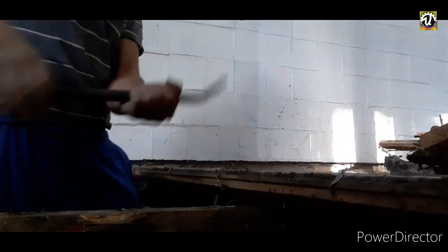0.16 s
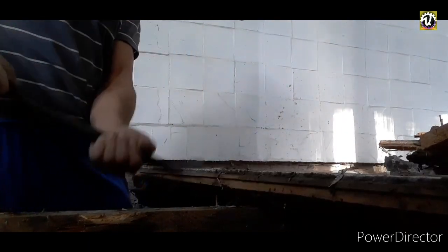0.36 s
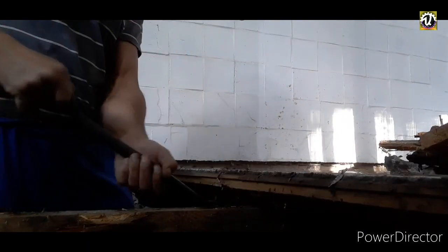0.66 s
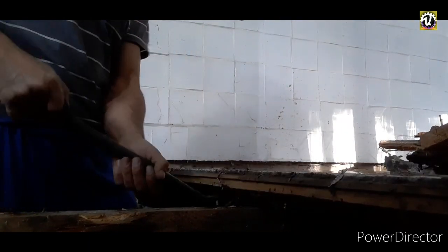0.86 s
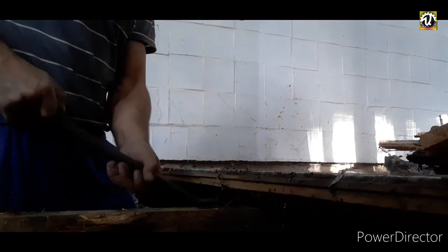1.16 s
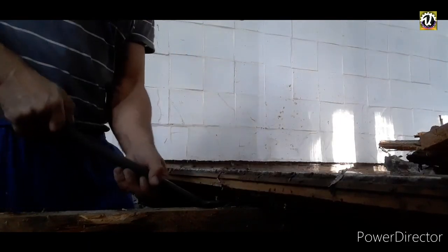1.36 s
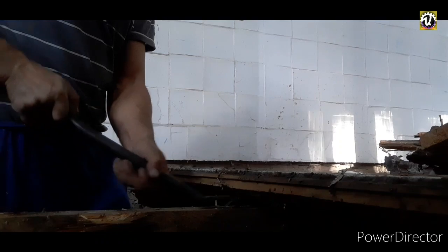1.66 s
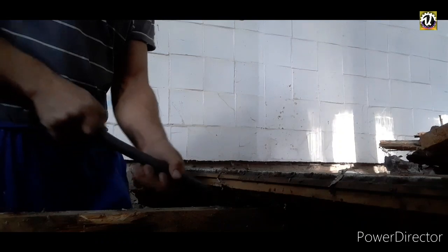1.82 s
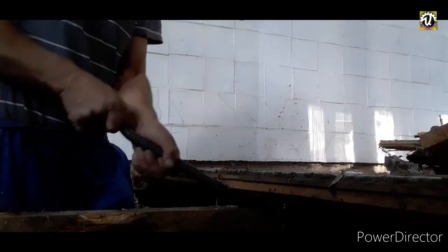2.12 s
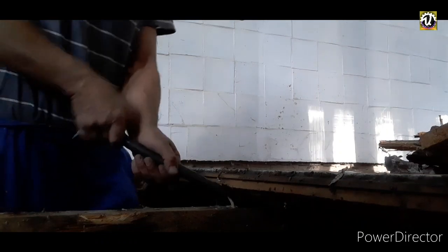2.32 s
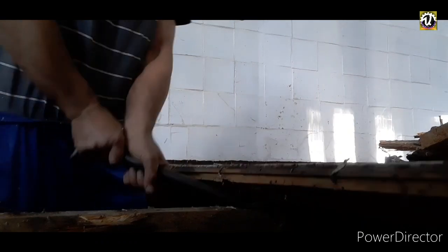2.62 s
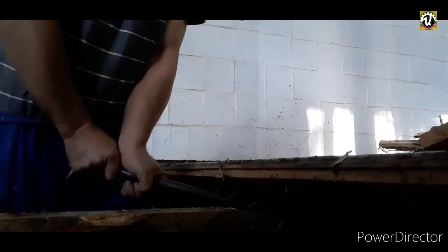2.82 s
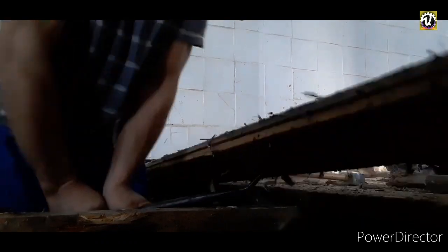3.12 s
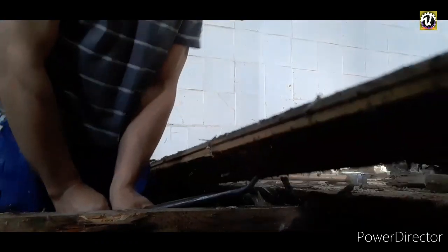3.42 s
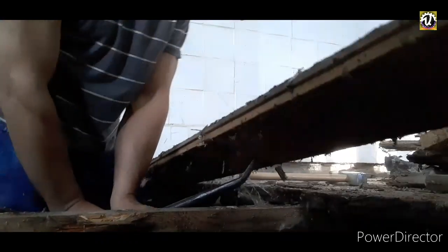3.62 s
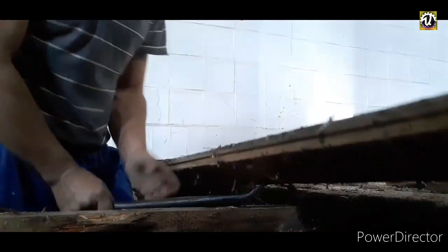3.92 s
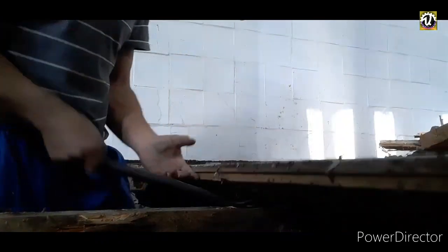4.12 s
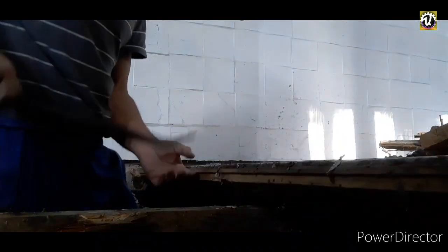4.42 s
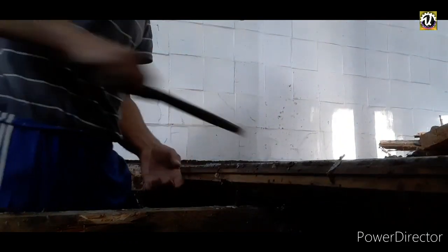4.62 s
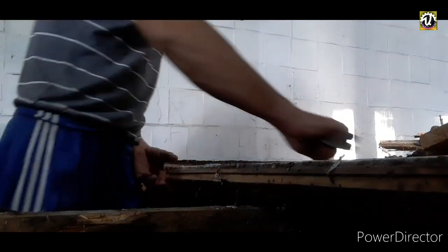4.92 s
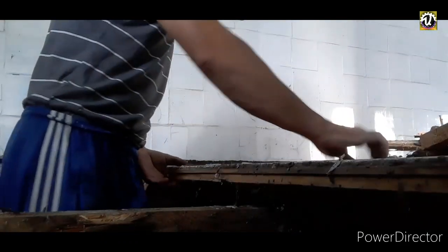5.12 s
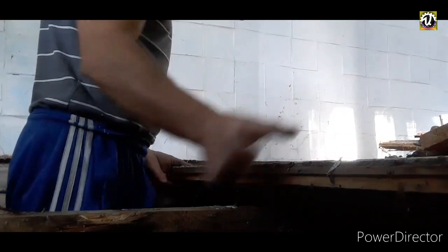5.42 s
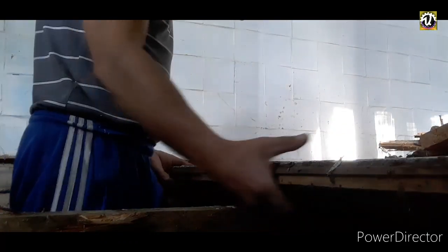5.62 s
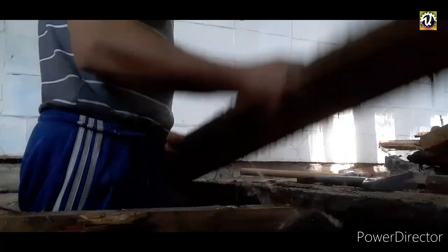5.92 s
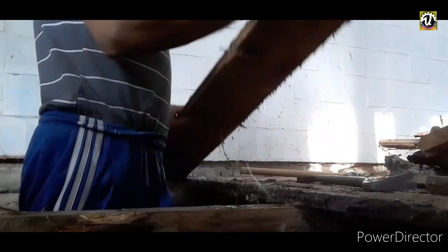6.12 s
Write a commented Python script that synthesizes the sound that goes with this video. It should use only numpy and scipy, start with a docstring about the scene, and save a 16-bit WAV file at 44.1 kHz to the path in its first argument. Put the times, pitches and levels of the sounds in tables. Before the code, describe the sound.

Faint wooden bumps open over a quiet hush, close to the microphone in a bare room that rings briefly after each sound. At about 0.8 seconds a steel crowbar clicks against an old floorboard. Hollow wooden knocks follow at 1.2 and 1.4 seconds, with small metal clinks and a very short nail squeak at 1.5. Softer knocks and grinding come around 2 seconds. From 2.7 seconds wood fibres crackle, building to a loud splintering crack at about 3.15 as the board tears free. Grit trickles down amid light knocks and snaps until 4.5. Around 5 seconds comes a clatter of wooden knocks, then a loud clank and scrape at 5.2, the steel ringing briefly. After a short lull, a thin, high nail squeak at 5.9 leads into a sharp crack at 6, with smaller snaps, knocks and falling grit to the end.

```python
"""Prying up an old floorboard

A bare room, with a phone's two microphone ports close to where a steel bar levers up a board.
Each knock leaves floor and room ringing low; slipping wood grinds, fibres snap, the board tears free.
Taps ring the steel, nails squeak by stick-slip in their holes, and grit trickles down.
The room rings on briefly after each sound, over a faint steady hush."""
import sys
import numpy as np
from scipy import signal
from scipy.fft import rfft, irfft
from scipy.io import wavfile
from scipy.ndimage import uniform_filter1d

SR = 44100
rng = np.random.default_rng(int(sys.argv[2]) if len(sys.argv) > 2 else 0)


def transcribe(u):
    """Save the signal u as a 16-bit wav file named by the first command-line argument.

    u: samples, shape (n,) or (channels, n), limited to [-1, 1]; the rate is SR.
    q: integer samples, one column per channel.
    """
    v = np.clip(np.atleast_2d(u).T, -1, 1)
    q = np.round(v * 32767).astype(np.int16)
    wavfile.write(sys.argv[1], SR, q)


N = 276066

# Blows on the floor; weight thumps, hardness clacks, and the struck spot favours one pitch:
# start_s, level_db, weight_db, hardness_db, spot_hz, spot_db
FLOOR_KNOCKS = [(.009, -54, 6.5, -1, 310, 2.5), (0.132, -59, -7, -3.5, 307, -5),
                (.409, -59, -4.5, -11, 310, 4.5), (.755, -45.5, 11.5, 3.5, 700, -6),
                (0.798, -38, 11, -4.5, 240, 6.5), (.911, -63, 2, -3, 900, 0),
                (.986, -58.5, 9, 9.5, 870, 16), (1.005, -52, 6, 6.5, 900, 6),
                (1.17, -28, 0.5, -3.5, 248, 10), (1.203, -20, -6, -18, 260, 4),
                (1.354, -37.5, -17, 2, 650, -4), (1.406, -21.5, 0.5, -6.5, 246, 7.5),
                (1.437, -18, -13.5, -17.5, 256, 4.5), (1.597, -64.5, -9, 10, 920, 13.5),
                (1.887, -32.5, -3.5, -9, 341, 0), (1.925, -35, 8.5, -5, 280, -1),
                (1.956, -35.5, 9.5, -2, 362, -6), (1.984, -36, 2, -19, 200, 3),
                (2.006, -43, -5, -15, 280, 12), (2.183, -39.5, 7, -3.5, 240, 7),
                (2.228, -41, 10.5, -0.5, 310, -1), (2.287, -35.5, -7.5, -13, 310, -12),
                (2.695, -47.5, 0, 4.5, 520, 4), (2.744, -45.5, 0, 4.5, 600, 1.5),
                (2.929, -41, -22, 5.5, 520, 0), (2.999, -44, -14.5, 7, 523, -3),
                (3.045, -44.5, -12, 9.5, 526, 1), (3.126, -25.5, -1.5, 8.5, 735, -1),
                (3.153, -14.5, -0.5, 1.5, 550, 14.5), (3.186, -16, -11, -6.5, 550, 13),
                (3.215, -25.5, -38, -13, 380, 12), (3.248, -26.5, -21.5, -13, 305, 12.5),
                (3.515, -38.5, 4, -8.5, 252, 0.5), (3.585, -45, -0.5, 1.5, 398, 5.5),
                (3.668, -51, 12, 2.5, 310, 0.5), (4.004, -56.5, 13, -5.5, 116.2, 4.5),
                (4.171, -42.5, 0.5, 9, 643, -4), (4.228, -40, 6, 1, 248.3, -0.5),
                (4.299, -45.5, 6, -3.5, 313, -3), (4.498, -59, -5.5, 2.5, 301.6, 0.5),
                (4.607, -57.5, -11, -0.5, 314, 4), (4.931, -22.5, -14, -5, 353, 3),
                (4.954, -23.5, -0.5, -1.5, 350, 9), (5.001, -23, -11, -0.5, 358, 6.5),
                (5.035, -32, -18, -15, 353, 11), (5.076, -24, -17, -8, 726, 2),
                (5.215, -12.5, -15, 0.5, 800, 8), (5.229, -25.5, -4, 1.5, 920, -7),
                (5.258, -13.5, -21, -22, 250, 11), (5.671, -55, -9, -4, 412, 10),
                (5.94, -40.5, -12, 2.5, 510, 0.5), (5.989, -33.5, -6, 9.5, 530, 3.5),
                (6.018, -33, -10, -5.5, 404, 3), (6.099, -40, -18, 4.5, 497, -1),
                (6.153, -35, 2.5, -4.5, 280, 3), (6.198, -39.5, 7, 2.5, 277, 1)]
# Wood fibres snapping: start_s, level_db, treble_boost_db
FIBRE_CRACKS = [(.755, -28.5, 3), (1.354, -35.5, 5), (1.39, -26.5, -9), (1.884, -44, 7), (1.92, -39, 13.5),
                (1.962, -43, -6), (2.181, -42.5, -13), (2.287, -41, 11.5), (2.695, -29.5, 15.5),
                (2.741, -41, 26.5), (2.808, -43, 12), (2.848, -37.5, 17.5), (2.864, -51, 19),
                (2.9, -50.5, 20), (2.912, -56, 9), (2.922, -37, 15), (2.926, -32, 27), (2.935, -25, 15),
                (2.994, -30, 20.5), (3.003, -29.5, 20), (3.043, -24.5, 17), (3.119, -21, 0),
                (3.127, -13.5, -2), (3.146, -24, 15.5), (3.154, -8, 3.5), (3.158, -14, 5.5),
                (3.166, -35, -1), (3.187, -31, -3), (3.354, -45.5, 15), (3.56, -54.5, 17.5),
                (3.583, -38.5, 16), (3.602, -38.5, -10), (3.703, -44, 18), (3.762, -48.5, 17),
                (3.834, -49, 3.5), (3.978, -43, 8.5), (4.175, -32.5, -6), (4.252, -41, 5),
                (4.338, -49, 7.5), (4.927, -35.5, 3), (4.945, -26.5, -10.5), (4.992, -25.5, -12),
                (5.062, -25.5, 0), (5.073, -23.5, 2), (5.097, -25, -15), (5.189, -29, -12),
                (5.215, -18, -8), (5.989, -10.5, -7), (5.998, -30, 19.5), (6.027, -36, -10),
                (6.122, -27, 5), (6.149, -34.5, 9), (6.218, -36, 9), (6.248, -30, 8.5)]
# Taps on the steel: start_s, level_db, favoured_hz, spread_octaves, ring_share (0-1, 1 rings freely)
BAR_TAPS = [(0.756, -38, 3950, 0.044, 0.2), (0.757, -36.5, 2350, 0.21, 0.28),
            (.757, -36, 12800, 0.21, 0.07), (.91, -42, 2020, 0.11, 0.2), (.94, -51, 2100, 0.27, .4),
            (.974, -54.5, 4220, 0.044, 0.22), (0.984, -44, 7730, 0.079, 0.06),
            (1.352, -30.5, 3950, 0.037, 0.3), (1.376, -39, 2540, .1, 0.44), (1.392, -33, 5700, 0.054, 0.23),
            (1.398, -42, 11600, 0.47, 0.1), (1.594, -42, 11300, .05, 0.36),
            (2.185, -57.5, 8100, 0.13, 0.57), (2.288, -41, 7900, 0.081, 0.1),
            (4.339, -62.5, 3910, 0.052, .6), (4.93, -43, 10300, 0.47, 0.37),
            (4.946, -45.5, 6600, 0.13, 0.17), (5.095, -36.5, 3660, 0.028, 1),
            (5.215, -24.5, 2070, 0.26, 0.51), (5.223, -33, 4200, .03, 0.98), (5.229, -40.5, 7630, 0.032, 1),
            (5.24, -44.5, 5300, 0.19, 0.7), (5.235, -39.5, 3470, 0.18, 0.73),
            (5.295, -36, 3600, 0.54, 0.22), (5.335, -37.5, 3560, 0.063, 0.4),
            (5.401, -52.5, 3510, 0.022, 0.4), (5.461, -57, 4160, 0.018, 1)]
# Nails slipping: start_s, length_s, level_db, start_hz, end_hz, unsteadiness (share of the pitch)
NAIL_SLIPS = [(1.478, .02, -21, 2555, 2550, .014), (5.897, .085, -33, 5870, 6350, .016)]
# Harmonics of a squeak: multiple, level_db
SQUEAK_HARMONICS = [(1, -12), (2, -17.5), (3, -26.5), (4, -46.5), (5, -51.5)]
# Course of the rubbing: time_s, grinding_db, grit_db
RUB_LEVELS = [(0, -68, -65), (.3, -74.5, -77), (.62, -97, -84), (.75, -90, -80), (.77, -63, -76),
              (.92, -55, -73), (1.22, -73, -75), (1.4, -55, -75), (1.64, -81, -81.5), (1.75, -110, -105),
              (1.87, -85, -76), (1.93, -38, -63), (2.09, -86, -86), (2.19, -48, -76.5), (2.3, -54, -76),
              (2.42, -67.5, -82.5), (2.68, -56, -67.5), (2.7, -57.5, -69), (2.76, -50.5, -61.5),
              (2.84, -51.5, -75), (2.91, -67, -77), (2.94, -52, -56), (2.99, -53, -69), (3.06, -44.5, -66),
              (3.15, -27, -46), (3.28, -48.5, -66.5), (3.4, -53.5, -84.5), (3.57, -59, -80.5),
              (3.6, -45, -74.5), (3.65, -52, -58), (3.705, -55, -62.5), (3.78, -60.5, -73), (4, -72, -69.5),
              (4.16, -47, -68), (4.2, -50, -66.5), (4.5, -68.5, -94), (4.92, -86.5, -105),
              (4.94, -41.5, -64), (5.04, -34, -58), (5.09, -36.5, -59), (5.2, -34, -69), (5.23, -21, -66),
              (5.33, -30, -75), (5.5, -73.5, -83.5), (5.84, -64, -100), (5.9, -48, -65.5),
              (5.98, -41.5, -57.5), (6.0, -47.5, -50), (6.1, -42, -62), (6.14, -45.5, -59),
              (6.26, -49.5, -68)]
# Low ringing of the floor and the bare room after each blow: pitch_hz, level_db, t60_s
LOW_RING_MODES = [(191, -10, 0.24), (198, -22.5, 0.05), (238.3, -5, 0.25), (277.3, -4.5, 0.14)]
LOW_MID_RING_MODES = [(312.45, -1.5, 0.22), (346.2, -3.5, 0.15), (382, 1, 0.079)]
# Modes of the joists, the edge's clack, the slap and the steel bar: pitch_hz, level_db, t60_s
JOIST_MODES = [(67, -3, .4), (83, -7.5, 0.51), (103.2, -6, 0.23), (117.95, 3.5, 0.34), (143, -2.5, 0.39)]
EDGE_MODES = [(440, -6, 0.15), (486, -6, 0.082), (544, -5.5, 0.16), (612, 5.5, 0.018), (669, -7.5, 0.045),
              (732.1, -4, 0.075)]
SLAP_MODES = [(837, 1, 0.024), (920, -5, 0.045), (1020, -13, 0.3), (1096, -20.5, 0.29), (1184, -7, 0.034),
              (1383, -4.5, 0.0094)]
BAR_MODES = [(1830, -4, .3), (1986, -2, .28), (2595, -2, .3), (3257, -8, .24), (3435, -8, 1.4),
             (3499, -6, .33), (3564, -3, .4), (3946, -3, .3), (4199, 0, .45), (5050, -4, .8),
             (5561, -2, .15), (6223, -4, .4), (6293, -8, 1.2), (7300, -8, .3), (7687, -4, .3),
             (7908, -6, .5), (8129, -4, .45), (9000, -6, .15), (10590, -2, .25), (11070, -6, .2),
             (12160, -8, .3), (13200, -8, .2), (14200, -8, .2)]
# Spectra of the snaps, the grit and the room tone: frequency_hz, gain_db
SNAP_SPECTRUM = [(760, -4), (1300, 10), (1430, -1), (1840, 6.5), (1980, 5), (5960, -4), (6480, -10.5),
                 (8430, -4.5), (10000, -21.5), (11200, -12.5), (13000, -12.5), (16000, -19.5)]
GRIT_SPECTRUM = [(760, -11), (1300, -7.5), (1520, -29), (1780, -6.5), (2370, -10.5), (3420, -5.5),
                 (6480, -1), (8300, 0), (9970, -14.5), (11200, -5), (13000, -4), (16000, -7)]
HUSH_SPECTRUM = [(24, -52), (40, -12.5), (329, 5.5), (516, 1.5), (1480, -17), (1950, -20), (4030, -17),
                 (5050, -8.5), (7360, -14), (9450, -18), (16000, -22)]
# Tail of the bare room: frequency_hz, t60_s, port_likeness (0-1), level_db
ROOM_BANDS = [(59.6, 0.49, 0.84, -9), (244, 0.44, 0.7, -5), (550, 0.36, 0.5, 3), (1000, 0.29, 0.21, 9.5),
              (3900, 0.32, 0, 10), (12000, 0.18, 0, 5.5)]
# Balance of the two ports: frequency_hz, left_minus_right_db
PORT_BALANCE = [(60, 1), (110, -0.5), (200, -2.5), (380, -3), (700, -4), (1290, -5.5), (2380, 0),
                (4400, -6.5), (8120, -4.5), (15000, 2)]

TOP_HZ = 15700  # upper limit of the phone


def knocks_and_grinding():
    """Blows ring floor and room, heavy ones thump, hard ones clack; slipping wood grinds between."""
    starts, db, weight, hardness, *spot = np.transpose(FLOOR_KNOCKS)
    times, grinding_db, _ = np.transpose(RUB_LEVELS)
    slips = grains(per_s=400, scatter_db=8.5)
    swell_s = .0034
    struck = rubbed = 0
    for modes, gain_db, heavy, hard, swell_share, rub_db in [
            (JOIST_MODES, -1.5, 1, 0, 1.2, -6),
            (LOW_RING_MODES, .1, .4, 0, .8, -2),
            (LOW_MID_RING_MODES, 4, 0, 0, .8, -1),
            (EDGE_MODES, 7, 0, 1, .4, -6),
            (SLAP_MODES, -3, 0, 1.1, .2, -10)]:
        blow_db = db + gain_db + heavy * weight + hard * hardness
        struck += knocks(modes, starts, blow_db, spot, swell_s * swell_share)
        rubbed += undb(rub_db) * unit(resonate(slips, modes))
    wood = struck + unit(rubbed) * undb(curve(times, grinding_db))
    # little treble above 1.5 kHz gets out of the knocks and grinding
    return butter(wood, 3, 1500, "low")


def knocks(modes, starts, levels_db, spot, swell_s, detune=.018, scatter_db=2.5, spot_octaves=.17):
    """Each blow rings a group of modes from its own spot, with new phases, sizes and tuning."""
    step = 8  # low modes need only an eighth of the sample rate
    out, t = np.zeros(N // step + SR), np.arange(SR // step) * step / SR
    hz, mode_db, t60 = np.transpose(modes)[:, :, None]
    swell = 1 - np.exp(-t / max(swell_s, .001))
    chance = rng.standard_normal((len(starts), 3, len(modes), 1))
    for start_s, db, spot_hz, spot_db, (off, size, phase) in zip(starts, levels_db, *spot, chance):
        favour_db = spot_db * nearness(hz, spot_hz, spot_octaves)
        decay = undb(mode_db + favour_db + scatter_db * size - 60 * t / t60)
        rings = decay * np.sin(2 * np.pi * (hz * (1 + detune * off) * t + phase))
        at = int(start_s * SR / step)
        out[at:at + len(t)] += undb(db) * swell * rings.sum(axis=0)
    return signal.resample_poly(out, step, 1)[:N] / np.sqrt(np.sum(undb(2 * mode_db)))


def fibre_cracks(snap_s=.0018, split_hz=7000):
    """Fibres snap in short bursts of noise, each with a dull and a bright half."""
    starts, db, treble_db = np.vstack([FIBRE_CRACKS, splinters()]).T
    dull = butter(bursts(starts, db, snap_s), 2, split_hz, "low")
    bright = butter(bursts(starts, db + treble_db, snap_s), 2, split_hz, "high")
    return colour(dull + bright, SNAP_SPECTRUM)


def splinters(count=9, start_s=3.05, end_s=3.15, treble_db=20):
    """The board tears free: extra crack rows, small and bright, at loosely even moments."""
    along = (np.arange(count) + rng.random(count)) / count
    db = -34.5 + 2 * rng.standard_normal(count)
    return np.transpose([start_s + along * (end_s - start_s), db, np.full(count, treble_db)])


def steel_bar(scrape_s=.0033, flutter_db=5):
    """A tap feeds the modes near its favoured pitch; a firm grip shortens and shakes the ring."""
    out, t = np.zeros(N + 2 * SR), np.arange(SR) / SR
    hz, mode_db, t60 = np.transpose(BAR_MODES)[:, :, None]
    swell = 1 - np.exp(-t / scrape_s)
    for start_s, db, favoured_hz, spread, ring_share in BAR_TAPS:
        near = nearness(hz, favoured_hz, spread)
        excited = near[:, 0] > .01
        shake = unit(uniform_filter1d(rng.standard_normal((len(hz), SR // 50)), 6))
        flutter = undb(flutter_db * (1 - ring_share) * shake).repeat(50, axis=1)
        decay = near * undb(db + mode_db - 60 * t / (ring_share * t60))
        rings = decay * np.sin(2 * np.pi * hz * t) * uniform_filter1d(flutter, 50)
        at = int(start_s * SR)
        out[at:at + SR] += swell * rings[excited].sum(axis=0)
    return out[:N]


def nail_squeaks(rise_db=12, fall_db_per_s=1300):
    """Fast stick-slip: an unsteady, gliding tone swells while the nail slips, then drops away."""
    out, t = 0, np.arange(N) / SR
    for start_s, length_s, db, start_hz, end_hz, unsteadiness in NAIL_SLIPS:
        pitch_wobble, level_wobble = unit(uniform_filter1d(rng.standard_normal((2, N)), 150))
        end_s = start_s + length_s
        slip_hz = curve([start_s, end_s], [start_hz, end_hz]) * (1 + unsteadiness * pitch_wobble)
        phase = 2 * np.pi * np.cumsum(slip_hz) / SR
        shape_db = np.minimum(rise_db * (t - end_s) / length_s, -fall_db_per_s * (t - end_s))
        tone = sum(undb(harmonic_db) * np.sin(k * phase)
                   for k, harmonic_db in SQUEAK_HARMONICS if k * end_hz < TOP_HZ)
        out += np.sqrt(2) * (t > start_s) * undb(db + shape_db + .82 * level_wobble) * tone
    return out


def falling_grit():
    """Dust and crumbs trickle down: dense tiny clicks over a soft hiss."""
    times, _, grit_db = np.transpose(RUB_LEVELS)
    trickle = unit(grains(per_s=2300, scatter_db=6)) + .75 * rng.standard_normal(N)
    return unit(colour(trickle, GRIT_SPECTRUM)) * undb(curve(times, grit_db))


def bare_room(source, wet_db, build_s=.004, right_lag_s=.00033):
    """Sound reaches the left port first; a diffuse tail builds up behind it and dies band by band."""
    t = np.arange(SR) / SR
    hz, *columns = np.transpose(ROOM_BANDS)
    response = 0
    for centre_hz in 44 * 2 ** np.arange(0, 8.6, .5):
        low_hz, high_hz = centre_hz / 2 ** .25, centre_hz * 2 ** .25
        t60, likeness, db = (np.interp(np.log(centre_hz), np.log(hz), column) for column in columns)
        mid, side = butter(rng.standard_normal((2, SR)), 2, [low_hz, high_hz], "band")
        tail = np.sqrt(1 + likeness) * mid + np.sqrt(1 - likeness) * np.array([side, -side])
        tail *= (1 - np.exp(-t / build_s)) * undb(-60 * t / t60)
        band_share = (high_hz - low_hz) / (SR / 2)
        energy = np.sum(tail ** 2, axis=1, keepdims=True)
        response += undb(db + wet_db) * tail * np.sqrt(band_share / energy)
    response[:, 0] += 1  # direct sound
    response[1] = np.roll(response[1], int(right_lag_s * SR))
    return signal.fftconvolve(response, source[None], axes=1)[:, :N]


def room_tone():
    """A faint, steady hush, separate at each port."""
    return undb(-70) * unit(colour(rng.standard_normal((2, N)), HUSH_SPECTRUM))


def resonate(drive, modes):
    """Ring decaying modes with a driving signal and add them up."""
    out = 0
    for hz, db, t60 in modes:
        radius, angle = np.exp(-np.log(1000) / (t60 * SR)), 2 * np.pi * hz / SR
        feedback = [1, -2 * radius * np.cos(angle), radius ** 2]
        out += undb(db) * signal.lfilter([0, radius * np.sin(angle)], feedback, drive)
    return out


def bursts(starts, db, decay_s, size=4096):
    """Noise bursts that swell quickly and die away."""
    out, age = np.zeros(N + size), np.arange(size) / SR / decay_s
    shape = (1 - np.exp(-age / .37)) * np.exp(-age)
    for start_s, gain in zip(starts, undb(db) * np.sqrt(decay_s * SR / 2 / size)):
        at = int(start_s * SR)
        out[at:at + size] += gain * unit(rng.standard_normal(size) * shape)
    return out[:N]


def grains(per_s, scatter_db):
    """Random clicks of widely scattered size."""
    hit = rng.random(N) < per_s / SR
    return hit * rng.choice([-1, 1], N) * undb(scatter_db * np.minimum(rng.exponential(size=N), 4))


def colour(x, spectrum):
    """Filter by (frequency_hz, gain_db) points on a log axis."""
    hz, db = np.transpose(spectrum)
    bins_hz = np.maximum(np.fft.rfftfreq(N, 1 / SR), 1)
    return irfft(rfft(x) * undb(np.interp(np.log(bins_hz), np.log(hz), db)), N)


def nearness(hz, centre_hz, octaves):
    return np.exp(-.5 * (np.log2(hz / centre_hz) / octaves) ** 2)


def butter(x, order, hz, kind):
    return signal.sosfilt(signal.butter(order, hz, kind, fs=SR, output="sos"), x)


def curve(times, values):
    return np.interp(np.arange(N) / SR, times, values)


def undb(db):
    return 10 ** (np.asarray(db, float) / 20)


def unit(x):
    return x / np.sqrt(np.mean(x ** 2))


def scene():
    """Wood, grit and steel at close range in the bare room, as they reach the two ports."""
    hush = room_tone()
    sound = bare_room(knocks_and_grinding(), wet_db=-2)
    sound += bare_room(falling_grit(), wet_db=2.5)
    sound += bare_room(fibre_cracks(), wet_db=-8)
    sound += bare_room(steel_bar() + nail_squeaks(), wet_db=-9)
    left = colour(sound[0], [(hz, db / 2) for hz, db in PORT_BALANCE])
    right = colour(sound[1], [(hz, -db / 2) for hz, db in PORT_BALANCE])
    return np.array([left, right]) + hush


def record(dry):
    """The phone drops the deep bass, fades what is quiet, rounds the loudest peaks and cuts the top."""
    sound = butter(dry, 4, 70, "high")
    # noise suppressor: below the knee the gain sinks with the level, by 6 dB at most
    knee_db = -44.5
    level_db = 10 * np.log10(uniform_filter1d(np.mean(sound ** 2, axis=0), 1300) + 1e-12)
    sound *= undb(-np.clip(.26 * (knee_db - level_db), 0, 6))
    sound /= (1 + np.abs(sound) ** 4) ** .25  # soft clipping
    return signal.sosfilt(signal.ellip(8, .2, 70, TOP_HZ, fs=SR, output="sos"), sound)


dry = scene()
out = record(dry)
transcribe(out)
```